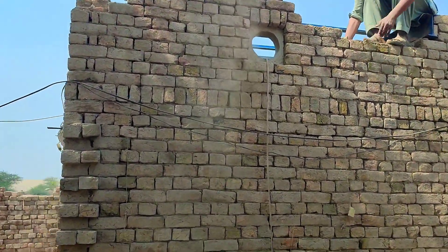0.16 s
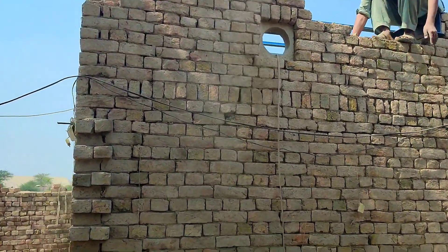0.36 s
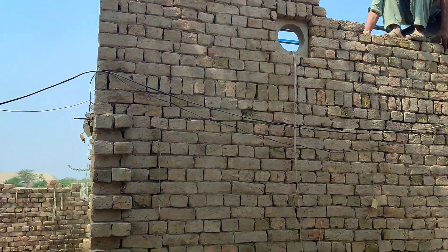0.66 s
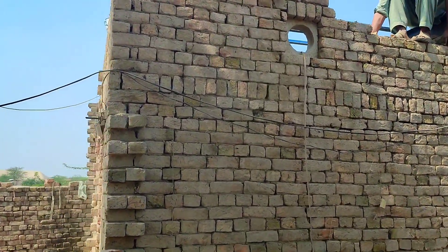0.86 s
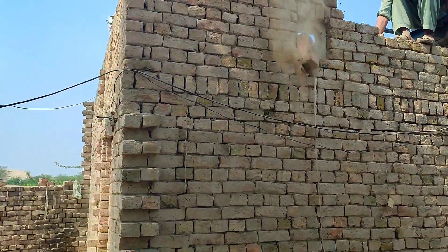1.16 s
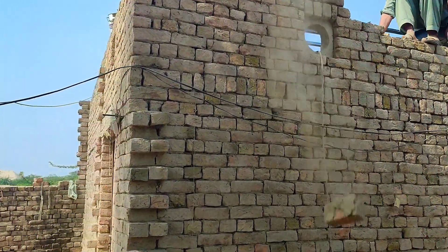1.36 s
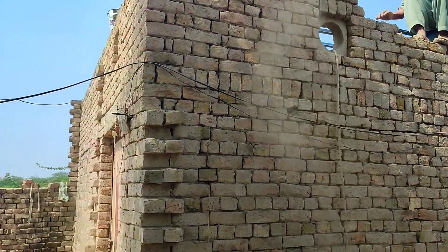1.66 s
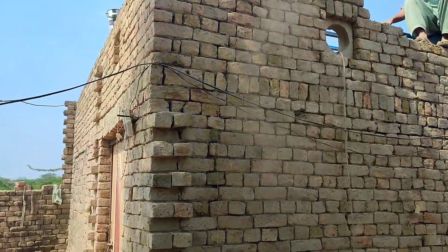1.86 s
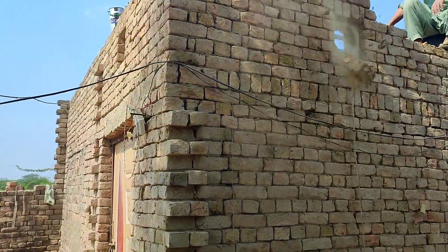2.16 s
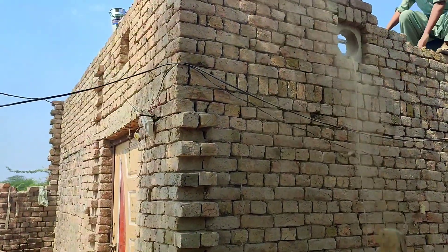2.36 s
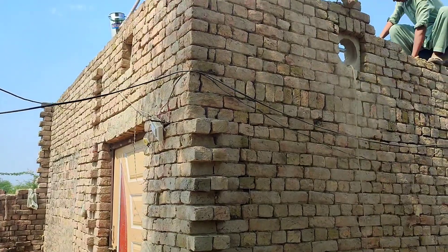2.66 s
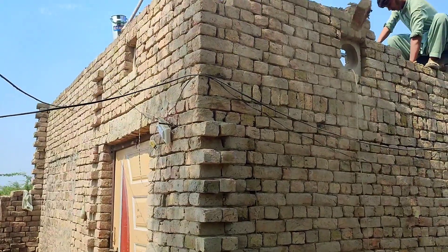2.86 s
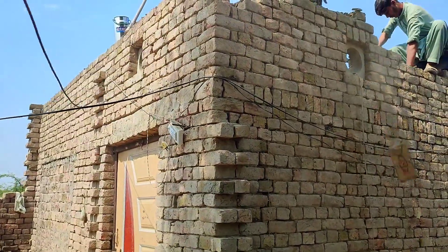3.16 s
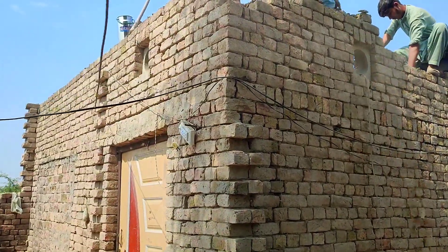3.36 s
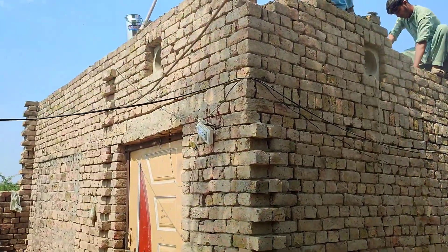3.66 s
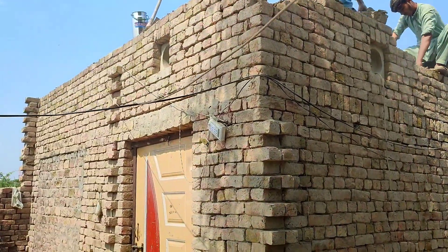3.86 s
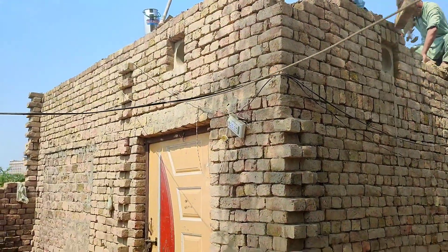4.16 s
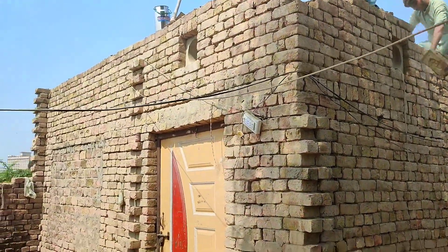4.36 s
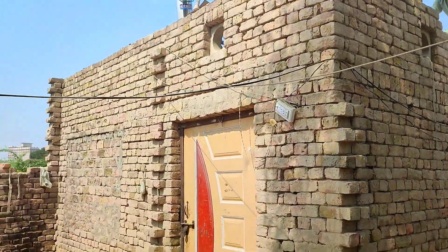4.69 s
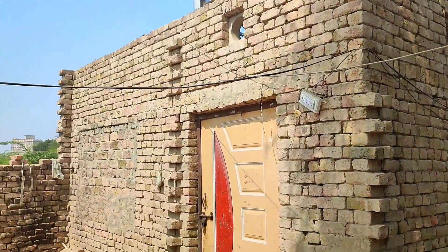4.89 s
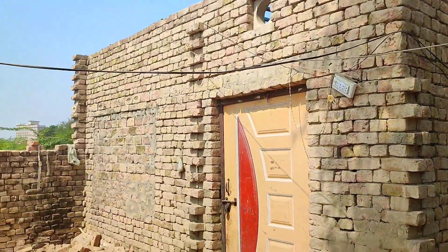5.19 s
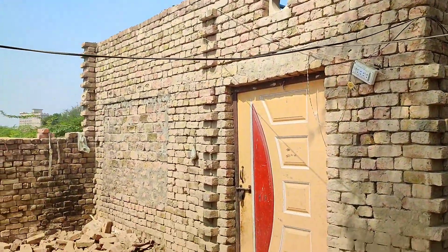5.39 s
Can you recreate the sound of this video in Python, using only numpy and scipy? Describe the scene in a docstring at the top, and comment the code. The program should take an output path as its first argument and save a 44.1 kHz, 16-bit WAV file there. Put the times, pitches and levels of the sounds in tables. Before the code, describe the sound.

Bricks drop onto a nearby rubble heap outdoors, knocking, clinking and spraying grit, with faint distant crows and light wind.

```python
"""Bricks dropped on a rubble heap

Close by, to the right of the microphone, bricks fall from a wall onto a heap of broken ones. Each
knocks, rings, tips over, sprays grit and sets pieces sliding; the yard walls answer briefly.
Crows and smaller birds call far off, metal rings once, and light wind buffets the microphone."""
import sys
import numpy as np
from scipy import signal
from scipy.fft import rfft, irfft, next_fast_len
from scipy.io import wavfile
from scipy.ndimage import uniform_filter1d, map_coordinates

SR = 44100
rng = np.random.default_rng(int(sys.argv[2]) if len(sys.argv) > 2 else 0)


def unload_wav(signal):
    """Save mono or channel-first audio to the path in sys.argv[1] as 16-bit WAV at rate SR, clipped to [-1, 1]."""
    wavfile.write(
        sys.argv[1],
        SR,
        np.round(np.clip(np.atleast_2d(signal).T, -1, 1) * 32767).astype(np.int16),
    )


N = 243873
T = np.arange(SR // 2) / SR  # seconds after a blow


def amp(db):
    """Decibels to gain."""
    return 10 ** (np.asarray(db) / 20)

def unit(x):
    """Scale to rms 1."""
    return x / np.sqrt(np.mean(x ** 2) + 1e-20)

def struck(x):
    """Scale to rms 1 over the first 10 ms."""
    return x / np.sqrt(np.mean(x[..., :SR // 100] ** 2) + 1e-20)

def fade(t60):
    """Decay by 60 dB in t60 seconds."""
    return amp(-60 * T / t60)

def rise(seconds):
    """Attack with this time constant."""
    return 1 - np.exp(-T / seconds)

def along(points, hz):
    """Read (Hz, value) points on a log frequency axis."""
    freqs, values = np.transpose(points)
    return np.interp(np.log(hz + 1), np.log(freqs + 1), values)

def wobble(rate):
    """A smooth random curve, rate knots a second."""
    return map_coordinates(rng.standard_normal(int(N * rate / SR) + 4), [np.arange(N) * rate / SR])

def filtered(x, response):
    """Pass x through a frequency response."""
    n = x.shape[-1]
    padded = next_fast_len(n + SR // 10)
    return irfft(rfft(x, padded) * response(np.fft.rfftfreq(padded, 1 / SR)), padded)[..., :n]

def coloured(x, points):
    """Pass x through a (Hz, dB) spectrum."""
    return filtered(x, lambda hz: amp(along(points, hz)))

def add(track, s, x):
    """Mix x into the track from second s."""
    i = round(s * SR)
    x = x[..., max(-i, 0):max(N - i, 0)]
    track[:, max(i, 0):max(i, 0) + x.shape[-1]] += x


# Width of diffuse sound at the microphone. Each row: frequency in Hz, side share.
SIDE_SHARE = [(100, 0.097), (500, 0.27), (1200, 0.78), (4000, 0.76), (12000, 0.7)]

def diffuse(pair):
    """Two unrelated signals become left and right, alike in the bass."""
    share = lambda hz: np.clip(along(SIDE_SHARE, hz), 0, .95)
    mid, side = filtered(pair, lambda hz: np.array([np.sqrt(1 - share(hz) ** 2), share(hz)]))
    return np.array([mid + side, mid - side])

def noise(n=len(T)):
    """White noise from all around."""
    return diffuse(rng.standard_normal((2, n)))

def patchy(pair, depth_db):
    """Random swells, each in its own band."""
    bands = signal.stft(pair, nperseg=1024)[2]
    swells = uniform_filter1d(rng.standard_normal(bands.shape[1:]), size=4, axis=0)
    swells = uniform_filter1d(swells, size=10, axis=1)
    return signal.istft(bands * amp(depth_db * unit(swells)), nperseg=1024)[1][:, :N]

def drift(points):
    """Gain that follows (seconds, dB) points."""
    return amp(np.interp(np.arange(N) / SR, *np.transpose(points)))


# Open country beyond the yard. Each row: frequency in Hz, relative level in dB.
HISS_SPECTRUM = [(120, -37), (200, -10), (497, -13), (769, -14.5), (1230, -12.5), (1330, -17.5),
                 (1910, -14.5), (3820, -24), (4840, -20.5), (5300, -23.5), (5800, -19.5), (13600, -36.5),
                 (15500, -59.5)]
# Its treble. Each row: time in seconds, relative level in dB.
TREBLE_LEVELS = [(0.0, -52.5), (0.8, -63), (1.02, -52.5), (1.57, -68), (1.68, -59.5), (2.5, -63),
                 (2.76, -56.5), (3.16, -62), (3.77, -57), (4.56, -62), (4.84, -51), (5.53, -58.5)]

def country_hiss(split_hz=1000):
    """A faint, distant hiss whose treble drifts in level."""
    hiss = unit(coloured(patchy(noise(N), depth_db=2), HISS_SPECTRUM) * amp(1.7 * wobble(3.2)))
    low = filtered(hiss, lambda hz: 1 / (1 + (hz / split_hz) ** 2))
    return amp(-50.5) * low + amp(8) * drift(TREBLE_LEVELS) * (hiss - low)


# Wind right on the microphone. Each row: frequency in Hz, relative level in dB.
BUFFET_SPECTRUM = [(12, -33), (20, 2), (43, 5), (70, -7), (108, -5), (245, -19), (265, -28.5), (500, -21),
                   (650, -44), (1100, -120)]
# Its gusts. Each row: time in seconds, relative level in dB.
GUSTS = [(0.0, -53), (0.2, -43.5), (1.15, -54), (1.88, -47), (2.65, -40), (3.34, -53), (3.62, -51),
         (4.34, -51), (4.91, -44), (5.53, -49.5)]

def wind():
    """Eddies buffet the two microphone ports, partly together and partly apart."""
    eddies = rng.standard_normal(N) + rng.standard_normal((2, N))
    buffet = unit(coloured(eddies, BUFFET_SPECTRUM) * amp(1.6 * wobble(27)))
    return amp(4) * drift(GUSTS) * buffet


# Reverberation of the yard. Each row: frequency in Hz, t60 in seconds.
YARD_DECAY = [(80, 0.72), (250, .42), (600, 0.35), (1300, 0.23), (2600, 0.15), (7000, 0.29), (14000, 0.24)]
# Its tone. Each row: frequency in Hz, gain in dB.
YARD_SPECTRUM = [(60, 5), (200, 1.5), (600, -3.5), (1300, 4.5), (2600, 8.5), (7000, -1), (14000, -5.5)]

def yard(x):
    """The walls scatter sound back; each frequency dies at its own speed."""
    hz, t, bands = signal.stft(rng.standard_normal((2, SR // 2)), SR, nperseg=256)
    decay = amp(-60 * t / along(YARD_DECAY, hz)[:, None])
    tail = signal.istft(bands * decay, SR, nperseg=256)[1][:, :len(T)]
    tail = diffuse(tail * rise(.0028))
    tail = coloured(tail / np.linalg.norm(tail[0]), YARD_SPECTRUM)
    return signal.fftconvolve(x, tail, axes=1)[:, :N]

def near_walls(x, count=7):
    """Early echoes off the house and the ground, each from its own direction."""
    ports = np.array([[1], [-1]])
    delays = [.0033 + .025 * late + .0004 * (bearing - .5) * ports
              for late, bearing in rng.random((count, 2))]
    return filtered(x, lambda hz: sum(np.exp(-2j * np.pi * hz * s) for s in delays) / np.sqrt(count))


def chirp(hz, length_s=.012):
    """One brief falling whistle."""
    u = np.linspace(-1, 1, int(length_s * SR))
    return np.cos(np.pi * u / 2) ** 2 * np.sin(2 * np.pi * np.cumsum(hz * (1 - .04 * u)) / SR)

# Small birds, far off. Each row: start in seconds, length in seconds, pitch in Hz, level in dB.
TWITTER_BOUTS = [(3.23, .09, 6200, -55), (4.224, .04, 6900, -49), (4.387, .12, 3790, -61),
                 (4.44, .14, 5260, -62.5), (4.475, .035, 6920, -50.5), (5.44, .09, 3740, -51.5)]

def small_birds(spacing_s=.021, pitch_spread=.045):
    """Quick runs of chirps, uneven in time and pitch."""
    out = np.zeros((2, N))
    for s, length, hz, db in TWITTER_BOUTS:
        for start in np.arange(s, s + length, spacing_s):
            late, sharp = rng.standard_normal(2)
            add(out, start + .0072 * late, amp(db) * chirp(hz * (1 + pitch_spread * sharp)))
    return out


def caw(length, pitch_hz, rasp=.3):
    """Arched, jittery harmonics and hoarse breath rattle through one throat resonance."""
    n = int(length * SR)
    u = np.arange(n) / n
    hz = pitch_hz * (1 - .55 * (u - .43) ** 2) * (1 + .015 * wobble(260)[:n])
    phase = 2 * np.pi * np.cumsum(hz) / SR
    throat_hz = 3.69 * pitch_hz
    throat = lambda f: 1 / (1 + ((f / throat_hz - throat_hz / (f + 1)) * 2.85) ** 2)
    voice = sum((throat(k * hz) + .03) * np.sin(k * phase) for k in range(2, 9))
    breath = filtered(rng.standard_normal(n), throat)
    rattle = 1 + .5 * np.sin(2 * np.pi * np.cumsum(78 + 16 * wobble(60)[:n]) / SR)
    call = np.sqrt(1 - rasp) * unit(voice) + np.sqrt(rasp) * unit(breath)
    return unit(call * rattle * np.sin(np.pi * u) ** .63)

# Distant calls. Each row: start in seconds, length in seconds, pitch in Hz, relative level in dB.
HARSH_CALLS = [(-.1, 0.28, 490.6, -53), (0.561, .21, 497, -54.5), (0.831, .35, 460.3, -46.5),
               (1.019, 0.082, 923, -49.5), (1.152, 0.074, 860, -51.5), (2.832, .25, 448.2, -45),
               (3.685, 0.26, 440, -46.5), (4.159, .28, 502.6, -54.5), (4.607, 0.077, 920, -46.5),
               (4.982, .24, 462, -50.5), (5.305, 0.28, 521, -53)]

def crows():
    """Crows caw, and a shriller bird gives shorter calls."""
    out = np.zeros((2, N))
    for s, length, hz, db in HARSH_CALLS:
        add(out, s, amp(db - 2) * caw(length, hz))
    return out


# Something metal nearby. Each row: frequency in Hz, level in dB, t60 in seconds.
METAL_MODES = [(562, -36.5, 0.6), (1110, -38.5, 0.15), (2276, -46.5, 0.14)]

def metal_tap(start_s=3.093):
    """One light tap sets the metal ringing."""
    out = np.zeros((2, N))
    modes = sum(amp(db) * np.sin(2 * np.pi * hz * T) * fade(t60) for hz, db, t60 in METAL_MODES)
    add(out, start_s, modes * rise(.0015))
    return out


# Bearing of the heap. Each row: time in seconds, lag of the left channel in seconds.
LEFT_LAG = [(0, 0.000023), (1.6, .00012), (2.6, 0.00012), (3.5, 0.00012), (4.9, .00022)]
# Shading at the microphone. Each row: frequency in Hz, left minus right in dB.
LEFT_SHADE = [(500, -0.2), (2500, -0.5), (4500, -7), (6500, -6), (9000, -4.5), (11000, -10.5), (14000, 1)]

def from_heap(s, x):
    """Sound from the heap reaches the right port first, and mostly louder."""
    lag = np.interp(s, *np.transpose(LEFT_LAG))
    half = np.array([[.5], [-.5]])
    return filtered(x, lambda hz: np.exp(-2j * np.pi * hz * lag * half)
                    * amp(along(LEFT_SHADE, hz) * half))


def grains(rate, spread_db):
    """Tiny fractures of random size, about rate a second."""
    sizes = amp(spread_db * np.minimum(rng.exponential(size=len(T)), 3.5))
    breaks = rng.random(len(T)) < rate / SR
    return diffuse(sizes * breaks * rng.standard_normal((2, len(T))))

# Brick grit, close up. Each row: frequency in Hz, relative level in dB.
GRIT_SPECTRUM = [(1200, -3.5), (3000, -4), (4300, -9), (5600, -3), (7300, -0.5), (8500, -11.5),
                 (11000, -11), (14000, -21), (16000, -40.5)]

def crumbs(t60=.36):
    """A patter of fine grit and a few coarse crumbs starts at once and thins out."""
    fine = unit(grains(rate=3100, spread_db=.5))
    coarse = unit(grains(rate=89, spread_db=.5))
    return unit(coloured(fine + amp(-6) * coarse, GRIT_SPECTRUM)) * fade(t60) * rise(.0015)


# The ground under the heap. Each row: frequency in Hz, relative level in dB.
EARTH_SPECTRUM = [(25, -25.5), (70, -2), (160, -4.5), (280, -8), (600, -36)]

def rumble(boom_t60=.19, settle_t60=.85):
    """The ground booms under a brick, then the heap settles more quietly."""
    earth = unit(coloured(noise(), EARTH_SPECTRUM))
    release = np.minimum(1, (T[-1] - T) / .1)
    return earth * (fade(boom_t60) + amp(-13.5) * fade(settle_t60)) * rise(.0037) * release

def sine(hz):
    """One mode at a random phase."""
    return np.sin(2 * np.pi * (hz * T + rng.random()))

CUSHION_S = .00062  # the crumbling edge softens each blow

def thud():
    """The ground takes a blow with a short, low thump."""
    earth = unit(coloured(noise(), EARTH_SPECTRUM))
    return struck((earth * fade(.096) + sine(84.5) * fade(.094)) * rise(CUSHION_S))


# A brick bedded in rubble. Each row: multiple of the knock pitch, relative level in dB.
BEDDED_MODES = [(.72, -4), (0.982, 2.5), (1.3, -1), (1.748, -5.5), (2.2, -11.5)]
# Crushing at the contact. Each row: frequency in Hz, relative level in dB.
CRUSH_SPECTRUM = [(150, -12), (400, 2), (1200, -5), (1500, -1), (1900, -7.5), (5000, -48)]

def knock(t60, hz):
    """The bedded brick sounds dully as its edge crushes."""
    modes = sum(amp(db + rng.normal(0, .31)) * sine(hz * ratio * rng.normal(1, .025))
                for ratio, db in BEDDED_MODES)
    crush = coloured(noise(), CRUSH_SPECTRUM)
    envelope = fade(t60) * rise(CUSHION_S)
    blow = struck(modes * envelope) + .5 * struck(crush * envelope)
    return struck(signal.sosfilt(signal.butter(5, 1550, fs=SR, output="sos"), blow))


# A brick ringing freely. Each row: multiple of the ring pitch, relative level in dB,
# t60 in seconds when the blow's own t60 is 0.029 s.
FREE_MODES = [(.75, -3.5, .05), (0.911, 0.5, 0.1), (.93, -16.5, 0.55), (1, 9, .06), (1.28, -10, .13),
              (1.36, -19.5, 0.081), (1.549, -17, 0.03), (2.091, -17, 0.1), (2.39, -23, 0.047),
              (2.7, -18, 0.087)]

def ring(t60, hz):
    """The brick's body rings, and the contact point cracks around the same pitch."""
    body = sum(amp(db + rng.normal(0, .4)) * sine(hz * ratio) * fade(life * t60 / .029)
               for ratio, db, life in FREE_MODES)
    around_pitch = lambda f: 1 / (1 + (np.log((f + 1) / hz) / .73) ** 4)
    crack = filtered(grains(rate=15000, spread_db=6), around_pitch)
    return struck((struck(body) + .7 * struck(crack * fade(t60))) * rise(.00025))

def contact(t60, knock_hz, ring_hz, knock_db, ring_db, grit_db):
    """One blow: the brick knocks, the ground thuds, the body rings and the edge crumbles."""
    low = amp(knock_db) * (knock(t60, knock_hz) + amp(-16.5) * thud())
    clink = amp(ring_db) * ring(t60, ring_hz)
    fractures = grains(rate=8100, spread_db=6) * fade(t60 * 1.7) * rise(.0018)
    return low + clink + amp(grit_db) * struck(coloured(fractures, GRIT_SPECTRUM))

def nudge(t60, knock_hz, ring_hz, knock_db, ring_db, grit_db):
    """A light contact sets a trickle of crumbs running."""
    return contact(t60, knock_hz, ring_hz, knock_db, ring_db, grit_db) + amp(grit_db - 5.5) * crumbs()


# Bricks shifting on the heap or working loose in the wall. Each row: start in seconds, t60 in seconds, knock
# pitch in Hz, # knock and grit levels in dB.
DULL_BUMPS = [(.423, .021, 700, -43.5, -52), (.445, 0.029, 745, -43.5, -50.5),
              (1.7767, 0.011, 694, -21, -38.5), (2.252, 0.031, 614, -25, -59),
              (2.255, 0.021, 1125, -28, -58), (2.51, 0.012, 1053, -40.5, -53.5),
              (2.704, .022, 540, -34, -47.5), (2.824, 0.043, 496, -33.5, -60),
              (2.837, 0.027, 1222, -28.5, -61.5), (4.501, 0.035, 480, -44.5, -76.5),
              (4.727, 0.027, 1285, -31.5, -44), (4.989, .022, 584, -41, -62), (5.187, .044, 490, -34, -68)]

def rolling_bricks():
    """Bricks roll over or work loose, bumping dully and hardly ringing."""
    out = np.zeros((2, N))
    for s, t60, hz, db, grit_db in DULL_BUMPS:
        bump = nudge(t60, knock_hz=hz, ring_hz=2580, knock_db=db, ring_db=db - 19, grit_db=grit_db)
        add(out, s, from_heap(s, bump))
    return out


# Shards sliding down the heap. Each row: start in seconds, ring pitch in Hz, ring and grit levels in dB.
SHARD_CLINKS = [(0.2486, 7570, -29, -30.5), (0.568, 2635, -35, -45.5), (.627, 2560, -48.5, -50),
                (0.671, 7600, -43, -52), (1.173, 3040, -51, -39.5), (1.209, 2180, -39, -60.5),
                (1.5503, 4860, -50, -50), (3.971, 7300, -50, -51), (4.019, 2644, -35, -56),
                (4.048, 1986, -34.5, -54), (4.7627, 2540, -38, -36), (4.802, 3170, -35, -36.5),
                (5.0305, 2970, -34.5, -35.5), (5.066, 3560, -39.5, -69), (5.208, 2520, -47, -42),
                (5.259, 2540, -60, -45)]

def shards(cycles=54):
    """Each shard clinks and faintly knocks the brick it falls on; small ones die sooner."""
    out = np.zeros((2, N))
    for s, hz, db, grit_db in SHARD_CLINKS:
        clink = nudge(cycles / hz, knock_hz=1160, ring_hz=hz,
                      knock_db=db - 16, ring_db=db, grit_db=grit_db)
        add(out, s, from_heap(s, clink))
    return out


# Bricks landing near the microphone. Each row: time in seconds, the brick's ring pitch in Hz,
# rumble and crumb spray levels in dB.
DROPS = [(.122, 2624, -34.5, -27.5), (1.612, 2597, -25, -24), (2.596, 2582, -29.5, -27),
         (3.497, 2863, -24.5, -26.5), (4.846, 2797, -21, -31.5)]
# Their blows as they strike and tip over. Each row: start in seconds, t60 in seconds,
# knock pitch in Hz, then knock, ring and grit levels in dB.
HARD_BLOWS = [(.107, 0.16, 887, -22.5, -32, -21.5), (0.1132, 0.031, 1060, -17.5, -24, -36),
              (0.1301, 0.015, 623, -9.5, -5.5, -19), (0.148, 0.013, 616, -20, -33, -41.5),
              (1.5822, .02, 706, -37.5, -64, -76), (1.592, 0.17, 580, -34, -39.5, -41),
              (1.6062, 0.013, 470, -16.5, -37, -18), (1.6209, 0.041, 630, -15, -30, -23.5),
              (1.646, 0.032, 860, -21, -37, -46), (1.651, .018, 742, -15, -27, -34),
              (2.589, 0.049, 1088, -25.5, -34, -23.5), (2.6015, 0.033, 593, -10.5, -28.5, -44),
              (2.632, .038, 493, -35, -31.5, -33), (3.4898, 0.043, 497, -8, -30, -18),
              (3.4955, 0.014, 639, -13.5, -18.5, -26), (3.5336, 0.025, 505, -49, -22, -35),
              (4.825, 0.063, 925, -34, -43, -42), (4.8412, 0.015, 420, -24.5, -49, -21),
              (4.845, 0.015, 1147, -16.5, -20.5, -27), (4.8786, 0.033, 580, -35, -30.5, -28.5)]

def dropped_bricks(mortar_lead_s=.042):
    """Each brick follows its loose mortar down, shakes the ground, throws crumbs and rings."""
    out = np.zeros((2, N))
    for s, _, rumble_db, spray_db in DROPS:
        mortar = amp(spray_db - 16.5) * crumbs()
        add(out, s - mortar_lead_s, from_heap(s, mortar))
        add(out, s, from_heap(s, amp(rumble_db) * rumble() + amp(spray_db) * crumbs(t60=.25)))
    for s, t60, knock_hz, knock_db, ring_db, grit_db in HARD_BLOWS:
        ring_hz = min(DROPS, key=lambda drop: abs(drop[0] - s))[1]  # each brick keeps its own pitch
        add(out, s, from_heap(s, contact(t60, knock_hz, ring_hz, knock_db, ring_db, grit_db)))
    return out


def scene():
    """From the microphone the heap is near and fairly dry, the birds far and echoing."""
    near = dropped_bricks() + rolling_bricks() + shards() + metal_tap()
    far = crows() + small_birds()
    echoes = amp(-6) * yard(far) + amp(-17) * near_walls(near) + amp(-15) * yard(near)
    return near + far + echoes + wind() + country_hiss()

def record(dry):
    """The hardest blows flatten near full scale; the treble ends at 14.7 kHz."""
    flattened = dry / (1 + np.abs(dry / 1.02) ** 6) ** (1 / 6)
    return filtered(flattened, lambda hz: 1 / (1 + (hz / 14700) ** 50))


dry = scene()
out = record(dry)
unload_wav(out)
```